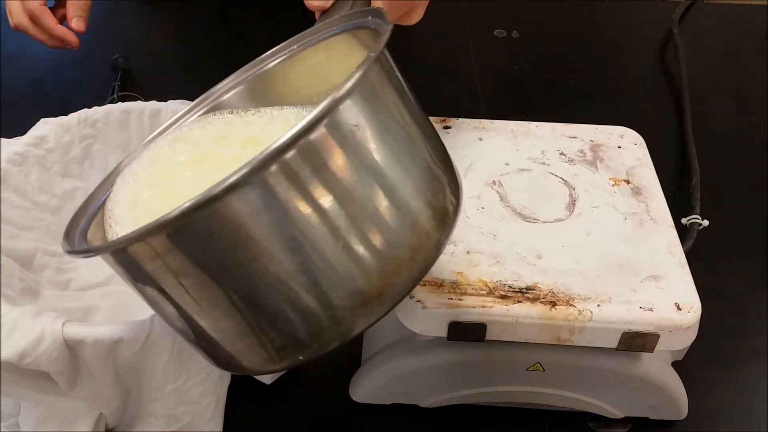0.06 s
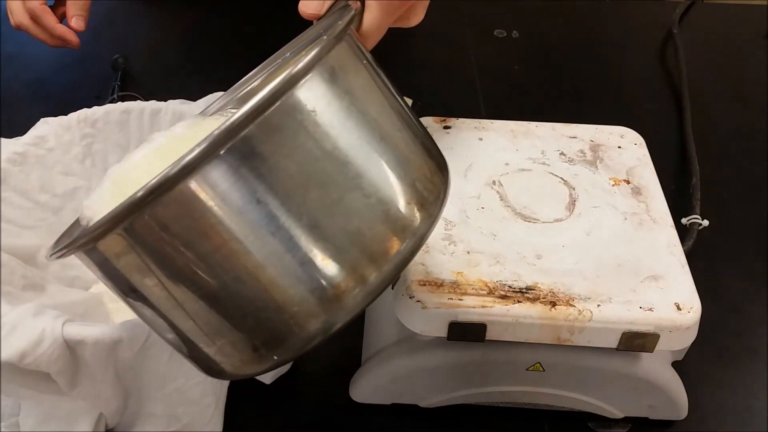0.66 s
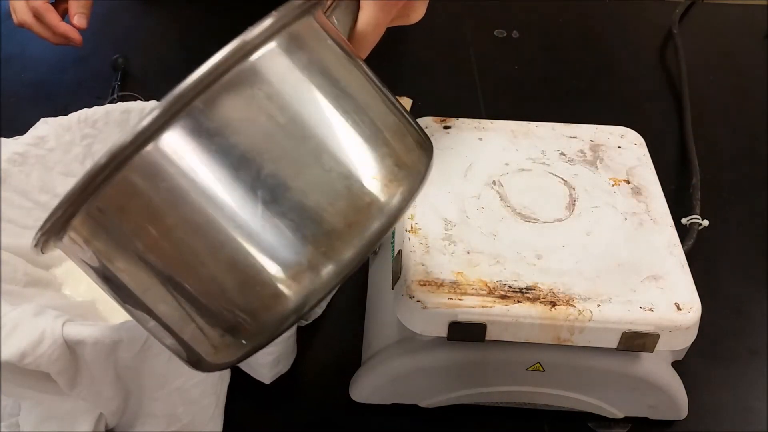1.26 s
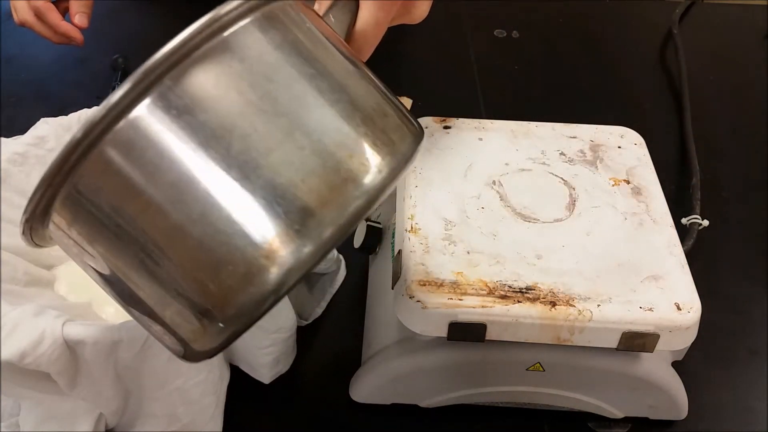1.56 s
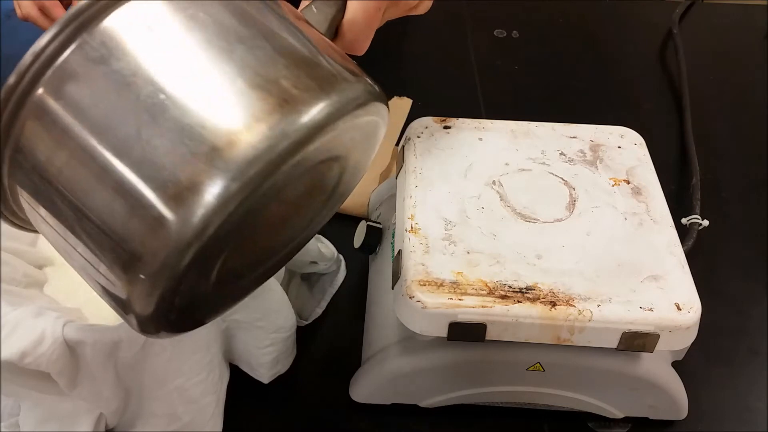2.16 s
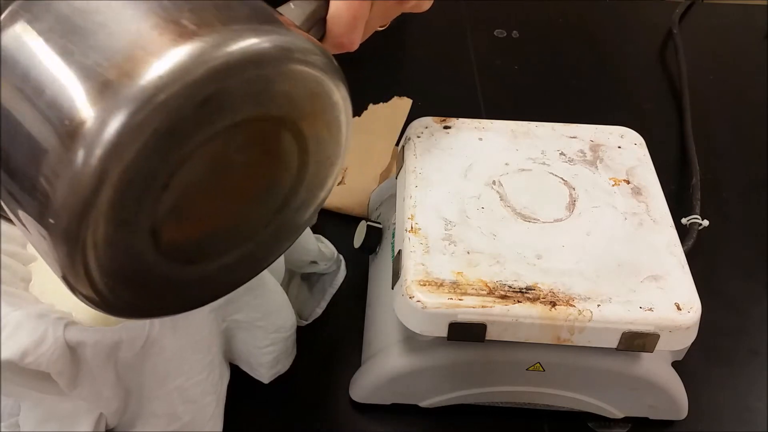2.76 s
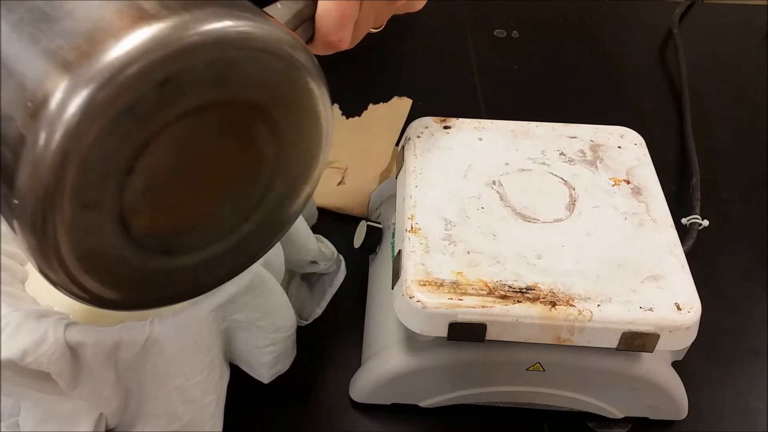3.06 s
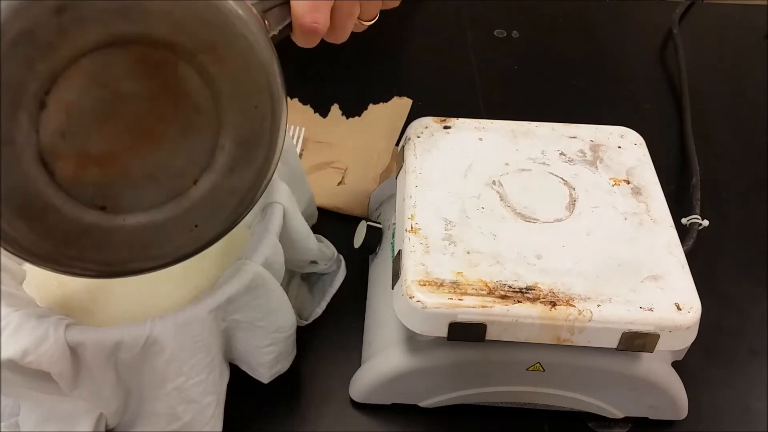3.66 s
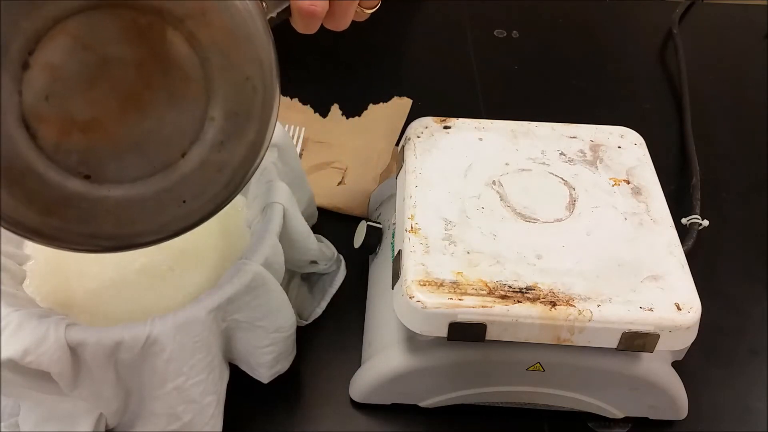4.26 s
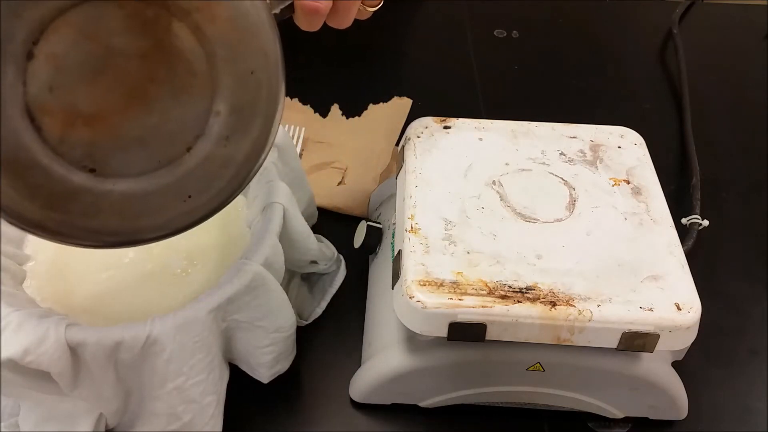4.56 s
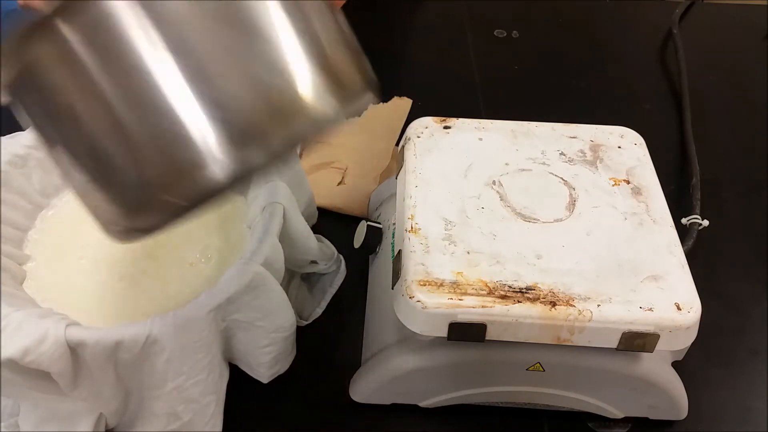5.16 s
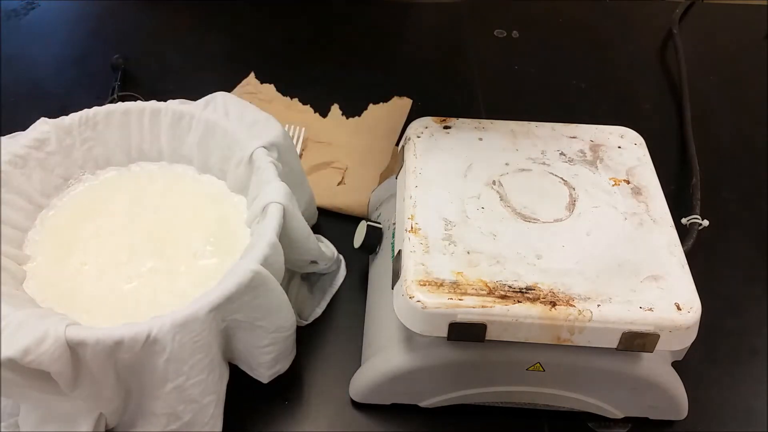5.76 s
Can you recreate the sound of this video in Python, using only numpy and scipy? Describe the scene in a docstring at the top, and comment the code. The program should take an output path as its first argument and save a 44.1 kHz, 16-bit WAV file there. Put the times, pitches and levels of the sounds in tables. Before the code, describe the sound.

Curdled milk is poured from a saucepan into a cloth-lined strainer. Whey first patters on the bare cloth, then bubbles and gurgles into a gathering pool as lumps of curd land with wet smacks and plops. The stream thins to a trickle and a few drops while froth fizzes softly. The pour is close and slightly left, in a hard-walled room with a steady low ventilation hum.

```python
"""Straining hot curds and whey

Curdled milk pours from a steel saucepan into a cloth-lined strainer, over humming ventilation.
Whey patters on the bare cloth, then drags ringing bubbles into the pool that gathers there.
Gushes of curd land with wet smacks and trap air that plops, while froth fizzes softly.
The stream thins to a trickle and a few last drops; a faint high rustle rises at the very end."""
import numpy as np
import sys
import numpy as np
from scipy import signal
from scipy.fft import rfft, irfft
from scipy.io import wavfile
from scipy.ndimage import uniform_filter1d, map_coordinates

SR = 44100
rng = np.random.default_rng(int(sys.argv[2]) if len(sys.argv) > 2 else 0)


def store_pcm(level_fs):
    """Save levels as 16-bit WAV."""
    pcm = np.round(np.clip(level_fs, -1, 1) * 32767).astype(np.int16)
    wavfile.write(sys.argv[1], SR, np.atleast_2d(pcm).T)


N = 265482
HZ = np.fft.rfftfreq(N, 1 / SR)
TIME = np.arange(N) / SR

# broad rush of the air duct: f/Hz, relative level/dB
DUCT_EQ = [(12, -27), (35, -8.5), (55, -4), (80, 0), (140, 0.5), (205, -13.5), (290, -9), (355, -16.5),
           (455, -11.5), (600, -24.5), (800, -25), (1100, -36.5), (1750, -38.5), (3200, -56.5)]
# narrow resonances humming in the duct: f/Hz, width/Hz, level/dB
DUCT_TONES = [(78.6, 1.2, -50.5), (123.96, 2.2, -47.5), (153.8, 5.7, -49.5), (194.6, 5.4, -57.5),
              (255.5, 8.8, -56), (270.5, 2.9, -55), (356.3, 2.5, -67), (469.6, 5.2, -58),
              (500.4, 7.6, -58.5), (545, 18, -66.5), (666, 12, -68.5), (721, 13, -69), (767.7, 5.8, -68),
              (944, 2.8, -76), (970, 11, -73.5)]
# slow swells in the hum: t/s, length/s, f/Hz, width/Hz, boost/dB
HUM_SWELLS = [(2.516, 0.44, 466, 12, 6.5), (3.744, 0.71, 267.2, 3.5, 10.5), (3.747, 0.44, 475, 46, 3)]
# microphone hiss: f/Hz, relative level/dB
HISS_EQ = [(1000, -10), (2500, -0.5), (3300, -5), (4300, -2), (6000, -14), (9000, -18.5), (10800, -8),
           (12200, 1.5), (13700, -4.5), (16000, 0)]
# how alike the room tone is left and right: f/Hz, coherence/0-1
AIR_COHERENCE = [(30, .99), (80, .99), (150, .98), (300, .88), (600, .6), (1200, .2), (3000, .05),
                 (12000, .05)]
# balance of the room tone: f/Hz, left minus right/dB
AIR_PAN = [(60, -4), (130, 1.5), (290, 1.5), (640, 3), (1410, 1), (3100, -1), (6820, -5.5), (15000, 6)]
# phase offset of the room tone: f/Hz, left lead/rad
AIR_PHASE = [(30, .4), (80, .3), (150, .1), (300, -.15), (800, -.65), (2000, -1.5)]
# reverb of the room: f/Hz, time to fall 60 dB/s
ROOM_DECAY = [(300, 0.98), (1500, 0.3), (5000, 0.36), (15000, 0.2)]
# the stream swells as the pan tips, then thins: t/s, level/dB
STREAM_FLOW = [(.35, -32), (.75, -7.5), (.92, -8.5), (1.2, -6.5), (1.65, 2), (2.3, -1), (2.6, -0.5),
               (3.0, -2), (3.3, -7.5), (3.7, -7), (4.0, -14), (4.6, -22)]
# masses of curd sliding over the rim: t/s, length/s, pool boost/dB, spray boost/dB
CURD_GUSHES = [(0.942, 0.023, 7, 9.5), (0.999, 0.096, 10.5, 8.5), (1.224, 0.21, 4.5, 4.5),
               (1.528, 0.075, 5.5, 5.5), (1.848, 0.099, 7.5, 9.5), (1.98, 0.053, 3, -2),
               (2.065, 0.088, 0, 3), (2.203, .055, 4, -1), (2.364, 0.18, 3, 6)]
# tone shared by the froth and the closing rustle: f/Hz, gain/dB
CRACKLE_EQ = [(2000, 2.5), (3500, -11.5), (5500, -11.5), (7000, -4), (8050, -1), (9300, -21), (11000, -3.5),
              (16000, -1)]
# tone of the ticking crumbs: f/Hz, gain/dB
CRUMB_EQ = [(800, -32), (1600, -9), (3500, 0), (5400, 3), (8000, 6.5), (11000, -26), (16000, 1)]
# tone of the spray: f/Hz, gain/dB
SPRAY_EQ = [(800, -29), (2000, -10.5), (3500, 4), (5200, 1), (6400, -6.5), (8000, -6), (11000, -1),
            (16000, -6)]
# tone of the pool's bubbles: f/Hz, gain/dB
POOL_EQ = [(900, -39.5), (1300, 2), (1800, -1.5), (2700, 2), (3700, -7), (5200, -12), (7000, -20.5)]
# air resonances between pan and strainer: f/Hz, width/Hz, gain/dB
CAVITY_MODES = [(1264, 58, 11), (1710, 130, 6.5), (2630, 320, -9), (3370, 240, 2), (5300, 590, -2)]
# air trapped under lumps of curd: t/s, level/dB, f/Hz, decay/cycles
CURD_PLOPS = [(0.793, -51, 2250, 2.3), (.949, -50, 3000, 3), (.954, -53, 1400, 2.6),
              (1.0136, -33.5, 4100, 8.3), (1.0255, -46, 5160, 9.2), (1.014, -50, 1600, 2.2),
              (1.028, -48, 1680, 3.3), (1.059, -43, 1720, 8.6), (1.085, -51, 1400, 5.4),
              (1.166, -45.5, 660, 4), (1.261, -50, 650, 5.4), (1.283, -36.5, 3320, 12),
              (1.322, -44, 617, 6.2), (1.353, -45, 676, 7), (1.39, -40, 2560, 6.5), (1.401, -36, 1810, 1.7),
              (1.403, -41, 3100, 3.2), (1.408, -37, 638, 5.2), (1.44, -49, 696, 3.7),
              (1.462, -46, 680, 4.5), (1.506, -37, 3540, 5), (1.539, -40, 2460, 9),
              (1.558, -33.5, 3610, 12), (1.567, -43, 2370, 5.1), (1.571, -45, 650, 5.6),
              (1.601, -39, 603, 9.9), (1.604, -38.5, 2450, 4), (1.677, -40, 3470, 8.7),
              (1.72, -39, 2640, 11), (1.745, -47, 650, 2.9), (1.749, -49, 1450, 5), (1.806, -51, 1670, 16),
              (1.826, -45, 1310, 7.9), (1.873, -43.5, 1300, 4.2), (1.89, -46.5, 3840, 7.1),
              (1.929, -48, 1570, 3.6), (1.939, -44, 2400, 8.6), (1.947, -43, 1720, 5.5),
              (1.962, -39, 2290, 7), (1.996, -38, 2400, 3), (2.026, -39, 1294, 14), (2.04, -53, 4200, 3.5),
              (2.042, -42.5, 703, 6.2), (2.07, -46, 637, 6), (2.072, -46, 2480, 8.7),
              (2.094, -39.5, 2260, 3.7), (2.131, -40, 3200, 10), (2.143, -37.5, 1690, 4.5),
              (2.1674, -40, 3250, 8.1), (2.171, -40, 1750, 3), (2.2085, -39, 1690, 4.2),
              (2.208, -38, 2160, 3.8), (2.207, -36.5, 650, 6), (2.217, -48, 2100, 3.6),
              (2.240, -41, 600, 8.3), (2.241, -37, 1670, 3.7), (2.256, -46, 1760, 4.6),
              (2.37, -46, 620, 4.5), (2.37, -42.5, 1750, 4.7), (2.398, -44, 1395, 4.5),
              (2.477, -50, 1410, 3), (2.49, -46, 1490, 3.7), (2.5734, -40, 1620, 6),
              (2.574, -48, 2570, 4.4), (2.69, -45, 1560, 4.4), (2.736, -53, 1680, 2.7),
              (2.83, -46, 1660, 5.8), (2.831, -48.5, 625, 3.4), (2.8545, -41, 1520, 3.6),
              (2.902, -39, 604, 9), (2.902, -50.5, 1780, 6.3), (2.956, -48.5, 1650, 4),
              (2.999, -47, 2400, 2.5), (3.012, -46, 1340, 7), (3.044, -50.5, 1540, 3.4),
              (3.114, -47, 3170, 4), (3.18, -59, 1550, 8.3), (3.335, -51, 1680, 7.2), (3.454, -56, 1720, 5),
              (3.532, -49.5, 1640, 5.4), (3.633, -42.5, 1710, 7.2), (3.633, -50, 2785, 22),
              (3.835, -53.5, 1430, 3.4)]
# wet hits of curd and drops: t/s, level/dB, body against brightness/dB, time to crest/ms
CURD_SMACKS = [(0.413, -64, -27, .6), (.508, -66, -25, 0.62), (.563, -59, -16, 0.8), (.583, -56, -18, .6),
               (0.6307, -51.5, -15, 0.83), (.676, -60, -19, .6), (.7262, -53, -31, 0.25),
               (.733, -49, -26, 0.57), (0.7487, -52, -22, 0.28), (0.769, -44, -16, 0.32),
               (0.859, -48.5, -27, 0.75), (0.8658, -48, -15, 0.69), (0.912, -55, -19, 0.95),
               (0.9468, -53, -20, 1.3), (0.978, -50, -8, 1.3), (1.0583, -49, -7, 0.89),
               (1.1266, -48.5, -13, 0.83), (1.143, -42, -21, 0.34), (1.197, -51, -1, 0.77),
               (1.2154, -51, -10, 1.1), (1.2226, -44.5, -11, 0.94), (1.2617, -45.5, 5, 1.2),
               (1.2804, -45, -17, 1.5), (1.3237, -50, -15, 0.67), (1.3598, -45.5, -1, 0.87),
               (1.3669, -45, 2, 0.66), (1.3992, -45.5, 1, 0.98), (1.458, -39, -4, 0.58),
               (1.5064, -34, -4.5, .35), (1.611, -46, 5, 0.84), (1.626, -53, 2, 0.46), (1.695, -54, 0, 0.3),
               (1.748, -52, 1, 0.32), (1.822, -49, 0, 0.42), (1.8901, -50, 2, 0.56),
               (1.9749, -42, -17, 0.14), (1.997, -40.5, -3, 1), (2.0388, -39, 1.5, 0.84),
               (2.0674, -50, 1, 0.42), (2.095, -60, -1, 0.62), (2.1117, -44, -8, 0.53),
               (2.142, -48, 2, 0.72), (2.169, -41.5, 3, 0.91), (2.207, -39.5, 1, 0.3),
               (2.266, -47, 0, 0.47), (2.2952, -46, -8, 0.27), (2.3684, -51, -3, 0.45),
               (2.375, -42, -19, 2.1), (2.393, -43.5, 2, 0.33), (2.4197, -38.5, -1, 1.3),
               (2.4536, -39.5, -14, 0.52), (2.4758, -50, 3, 0.41), (2.488, -53, 3, 0.37),
               (2.5323, -47.5, 1, 0.31), (2.5727, -44, 1, 1.44), (2.59, -42.5, -6, 0.68),
               (2.6484, -45, 6, 0.5), (2.652, -48, 0, 0.4), (2.6574, -47, -5, 0.67),
               (2.6687, -44.5, 7, 0.55), (2.714, -49, 0, 0.38), (2.7424, -46.5, 2, 0.56),
               (2.8047, -51, -2, 0.46), (2.831, -54, -5, 0.43), (2.8557, -42.5, -9, .35),
               (2.9036, -51, -11, 0.38), (2.9567, -59.5, 3, 2), (3, -56, 3, .4), (3.043, -57, -16, 0.4),
               (3.113, -55, -12, 0.75), (3.145, -53, 5, .4), (3.201, -54, -8, .4), (3.2132, -48, -1.5, 0.4),
               (3.2965, -56, -18, 0.35), (3.392, -49, -4, 0.91), (3.4335, -58, -6, 0.68),
               (3.451, -59, -4, .4), (3.621, -57.5, 0, 0.72), (3.688, -56, -10, 0.39),
               (3.705, -64, 3, 0.39), (3.955, -62, -31, 0.35), (5.003, -65, -26, 0.84)]

COVERED_S = 1.44  # the pool covers the cloth


def gain_of(db):
    """Decibels to amplitude."""
    return 10 ** (np.asarray(db) / 20)


def unit_rms(x):
    """Scales to rms 1."""
    return x / np.sqrt(np.mean(x ** 2) + 1e-20)


def curve_at(points, hz):
    """Reads a curve along a log-frequency axis."""
    f, value = np.transpose(points)
    return np.interp(np.log(hz + 1), np.log(f + 1), value)


def eq(x, points):
    """Filters by a curve of f/Hz, gain/dB."""
    size = x.shape[-1]
    return irfft(rfft(x) * gain_of(curve_at(points, np.fft.rfftfreq(size, 1 / SR))), size)


def whitened(puff):
    """Flattens the broad humps in a puff's spectrum, keeping its energy."""
    spectrum = rfft(puff)
    power = uniform_filter1d(abs(spectrum) ** 2, size=len(puff) // 40)
    return irfft(spectrum / np.sqrt(power + 1e-12), len(puff)) * np.linalg.norm(puff)


def add(mix, s, sound):
    """Mixes a stereo sound in at time s."""
    part = mix[:, round(s * SR):][:, :sound.shape[1]]
    part += sound[:, :part.shape[1]]


def panned(sound, left_db, lag_ms=.16, scatter_ms=.075):
    """The strainer stands to the left, so the right side hears it softer and a little later."""
    lag = max(lag_ms + scatter_ms * rng.standard_normal(), 0) * SR / 1000
    late = map_coordinates(sound, [np.arange(len(sound)) - lag], order=3)
    return np.array([sound * gain_of(left_db / 2), late * gain_of(-left_db / 2)])


def surge(start, length, rise, fall):
    """Attack, hold and release, from 0 to 1 and back; length includes the attack."""
    return np.clip(np.minimum((TIME - start) / rise, 1 - (TIME - start - length) / fall), 0, 1)


def flow_db():
    """Strength of the stream at every moment."""
    return np.interp(TIME, *np.transpose(STREAM_FLOW), left=-200)


def gush_db(column):
    """What the gushes add to the pool (column 2) or to the spray (column 3)."""
    return sum(row[column] * surge(row[0], row[1], rise=.009, fall=.05) for row in CURD_GUSHES)


def burst(ms, size=1024):
    """A film of liquid tears: a puff of noise that crests after ms and dies away."""
    age = np.maximum(np.arange(size) - 32, 0) / SR / (ms / 1000)
    return age * np.exp(1 - age) * rng.choice([-1., 1.], size)


def squelch(hz, ms):
    """An air pocket collapses: a puff of noise centred on its pitch, peak rms 1."""
    band = [(hz * .55, -20), (hz * .9, -2), (hz * 1.3, -2), (hz * 2, -13), (hz * 4, -32)]
    puff = eq(whitened(burst(ms, size=3072)), band)
    return puff / np.sqrt(uniform_filter1d(puff ** 2, size=88).max())


def bubble(hz, cycles, rise, size=3072):
    """Trapped air rings for a few cycles, its pitch rising as it nears the surface."""
    turns = np.arange(size) / SR * hz
    age = turns / cycles
    glide = 1 + rise * np.minimum(age, 10) / 2
    return (1 - np.exp(-turns ** 2)) * np.exp(-age) * np.sin(2 * np.pi * turns * glide)


def shower(grains, per_s, spread_db, left_db):
    """Scatters each grain at random moments and levels, a few of them loud."""
    out = np.zeros((2, N))
    count = max(int(per_s * N / SR / len(grains)), 1)
    for grain in grains:
        when, strength = np.random.default_rng(rng.integers(2 ** 31)).random((count, 2)).T
        gains = gain_of(spread_db * np.minimum(-np.log(1 - strength), np.pi))
        train = np.bincount((when * N).astype(int), gains, N)
        out += signal.oaconvolve(train[None], panned(unit_rms(grain), left_db), axes=1)[:, :N]
    return out


def ventilation(rush_db=-40.5, hiss_db=-71):
    """The bed: duct noise with humming resonances, nearly mono in the bass, plus microphone hiss."""
    power = gain_of(curve_at(DUCT_EQ, HZ)) ** 2 / (1 + (HZ / 3500) ** 8)
    power *= gain_of(rush_db) ** 2 / power.sum()
    for hz, width, db in DUCT_TONES:
        peak = 1 / (1 + ((HZ - hz) / width) ** 2) ** 2
        power += gain_of(db) ** 2 * peak / peak.sum()
    hiss = gain_of(curve_at(HISS_EQ, HZ)) ** 2
    power += gain_of(hiss_db) ** 2 * hiss / hiss.sum()
    left, diffuse = np.exp(2j * np.pi * rng.random((2, len(HZ))))
    coherence = curve_at(AIR_COHERENCE, HZ)
    pair = np.array([left, coherence * left + np.sqrt(1 - coherence ** 2) * diffuse])
    pair *= gain_of(np.outer([1, -1], curve_at(AIR_PAN, HZ)) / 2)
    pair *= np.exp(1j * np.outer([1, -1], curve_at(AIR_PHASE, HZ)) / 2)
    return irfft(pair * np.sqrt(power / 2) * N, N)


def hum_swells(bed):
    """Single bands of the hum grow and fade."""
    out = bed.copy()
    for start, length, hz, width, db in HUM_SWELLS:
        band = irfft(rfft(bed) * np.exp(-((HZ - hz) / width) ** 2), N)
        out += band * (gain_of(db * surge(start, length, rise=.11, fall=.11)) - 1)
    return out


def froth_and_rustle(froth_db=-68, follows=.46, fade_db_per_s=19, rustle_s=5.83, rustle_db=-70.5):
    """Foam fizzes and fades after the flow; a faint high rustle, perhaps cloth or pan, rises last."""
    grains = [burst(ms) for ms in np.geomspace(.3, 1.5, 12)]
    crackle = shower(grains, per_s=900, spread_db=4, left_db=2)
    drained_s = np.maximum(TIME - STREAM_FLOW[-1][0], 0)
    froth = gain_of(froth_db + follows * flow_db() - fade_db_per_s * drained_s)
    rustle = gain_of(rustle_db) * np.clip((TIME - rustle_s) / .18, 0, 1)
    return (froth + rustle) * unit_rms(eq(crackle, CRACKLE_EQ))


def crumbs(level_db=-68, follows=.91, runoff_s=2.1, fade_s=.32, early_db=-5, empty_s=3.95):
    """Curd crumbs tick on the wet cloth, most once the whey has run off, until the pan is empty."""
    grains = [burst(ms) for ms in np.geomspace(.25, .7, 12)]
    ticks = shower(grains, per_s=110, spread_db=2.8, left_db=2)
    whey = np.clip(1 - (TIME - runoff_s) / fade_s, 0, 1)
    remaining = np.clip((empty_s - TIME) / fade_s, 0, 1)
    level = remaining * gain_of(level_db + follows * flow_db() + early_db * whey)
    return level * unit_rms(eq(ticks, CRUMB_EQ))


def spray(level_db=-70.5, follows=.96, bare_db=13, first_curd_s=.99, whey_body_db=-5):
    """Fine droplets patter on the cloth, harder while it is bare, thin until the first curd lands."""
    grains = [burst(ms) for ms in np.geomspace(.15, .9, 24)]
    drops = unit_rms(eq(shower(grains, per_s=600, spread_db=4.4, left_db=3), SPRAY_EQ))
    body = eq(drops, [(5500, 0), (7500, -30)])
    drops += body * (gain_of(whey_body_db) - 1) * (TIME < first_curd_s)
    bare = (1 - np.tanh((TIME - COVERED_S) / .14)) / 2
    return gain_of(level_db + follows * flow_db() + gush_db(column=3) + bare_db * bare) * drops


def gurgle(level_db=-57, follows=.45, from_s=1.1, hz=674, sink_hz_per_s=56, shallow_s=1.38):
    """Large air pockets churn under the heavy stream, with a 5 dB lift as the pool first forms."""
    grains = [bubble(hz * step, cycles=4.5, rise=.015) for step in np.geomspace(.8, 1.12, 12)]
    churn = eq(shower(grains, per_s=170, spread_db=2, left_db=1), [(800, 0), (1050, -16)])
    age = np.maximum(TIME - from_s, 0)
    slowed = np.cumsum(1 - sink_hz_per_s * age / hz)  # larger pockets ring lower and longer
    sinking = np.array([np.interp(slowed, np.arange(N), side) for side in churn])
    forming = np.exp(-((TIME - shallow_s) / .1) ** 2)
    level = np.minimum(age / .1, 1) * gain_of(level_db + follows * flow_db() + 5 * forming)
    return level * unit_rms(sinking)


def cavity(splashes, slosh_depth=.03, slosh_per_s=14):
    """The air between pan and strainer rings with each splash; its pitches wander as the milk sloshes."""
    out = splashes.copy()
    knots = np.arange(0, N / SR + 1, 1 / slosh_per_s)
    for hz, width, db in CAVITY_MODES:
        slosh = np.interp(TIME, knots, rng.standard_normal(len(knots)))
        carrier = np.exp(2j * np.pi * np.cumsum(hz * (1 + slosh_depth * slosh)) / SR)
        pole = np.exp(-np.pi * width / SR)
        ring = carrier * signal.lfilter([1 - pole], [1, -pole], splashes / carrier)
        out += gain_of(db) * 2 * ring.real
    return out


def pool(level_db=-61.5, from_s=.63, filling_s=.57, ring_s=.0012, young_db=2, darken_db_per_s=1.5):
    """Curds squelch in and the stream drags bubbles under, a few ringing clear; deeper sounds darker."""
    pitches = np.geomspace(1200, 5800, 30) * rng.uniform(.867, 1, 30)
    grains = [bubble(hz, cycles=hz * ring_s, rise=.007) for hz in pitches]
    grains += [squelch(hz, ms=.8) for hz in pitches]
    churn = shower(grains, per_s=1400, spread_db=4.6, left_db=3.5)
    churn = unit_rms(cavity(eq(churn, POOL_EQ)))
    clear_pops = [bubble(hz, cycles=8, rise=.02) for hz in np.geomspace(1350, 3900, 24)]
    churn += .22 * unit_rms(shower(clear_pops, per_s=45, spread_db=2.5, left_db=2))
    treble = eq(churn, [(1900, -30), (2400, 0)])
    treble_db = young_db - darken_db_per_s * np.clip(TIME - COVERED_S, 0, 2)
    churn += treble * (gain_of(treble_db) - 1)
    filled = np.clip((TIME - from_s) / filling_s, 0, 1)
    return filled * gain_of(level_db + flow_db() + gush_db(column=2)) * churn


def plops(level_db=-1.8, knock_db=-5, closing_db=-15):
    """Sinking curds trap bubbles that the thick milk damps fast; each hole closes with a squelch."""
    out = np.zeros((2, N))
    for s, db, hz, cycles in CURD_PLOPS:
        squelch_db = -6 - 4 * max(cycles - 4, 0)  # longer rings are cleaner
        plop = bubble(hz, cycles, rise=.006) + gain_of(squelch_db) * squelch(hz, ms=.6)
        plop += gain_of(knock_db) * (cycles < 7) * squelch(hz * 1.3, ms=.2)  # the lump's first slap
        add(out, s, gain_of(db + level_db) * panned(plop, left_db=3.5, lag_ms=.125, scatter_ms=.015))
        closing = panned(squelch(hz * 1.15, ms=2), left_db=3)
        add(out, s + .0047, gain_of(db + level_db + closing_db) * closing)
    return out


def smacks(level_db=3, droplet_db=-16, snap_db=14):
    """Each lump slaps the wet cloth and throws a droplet that lands just after; heavy ones are darker."""
    out = np.zeros((2, N))
    for s, db, body_db, ms in CURD_SMACKS:
        heavy_db = np.clip(body_db + 4, -20, 4)
        left_db = .5 + 8.5 * np.exp(-(s / 1.33) ** 2)  # the stream moves from left edge to middle
        tone = [(900, -31 + heavy_db), (1600, -7 + heavy_db), (3500, heavy_db),
                (5400, .5 + heavy_db / 2), (6800, -6.5), (8500, .5),
                (11000, -3 - heavy_db / 5), (16000, -7 - heavy_db / 2)]
        for wait_s, hit_db in [(0, 0), (rng.uniform(.0015, .003), droplet_db)]:
            puff = burst(ms)
            puff[np.argmax(abs(puff))] *= 1 + gain_of(snap_db)  # one sharp snap at the crest
            hit = panned(eq(whitened(puff), tone), left_db, lag_ms=.15, scatter_ms=.035)
            add(out, s + wait_s, gain_of(db + level_db + hit_db) * hit)
    return out


def room(pour, early_db=-11, tail_db=-10):
    """Quick reflections from pan and bench, then the short tail of a hard-walled room."""
    size = SR // 2
    age = np.arange(size) / SR
    taps = rng.standard_normal((2, size)) * (rng.random((2, size)) < .1)
    early = taps * np.exp(-age / .003) * (age > .0005)
    early /= np.linalg.norm(early, axis=1)[:, None]
    hz, t, bands = signal.stft(taps[::-1] * (age > .008), SR, nperseg=256)
    decay = gain_of(-60 * t / curve_at(ROOM_DECAY, hz)[:, None])
    tail = signal.istft(bands * decay, SR, nperseg=256)[1][:, :size]
    response = gain_of(early_db) * early + gain_of(tail_db) * tail / np.linalg.norm(tail[0])
    return pour + signal.fftconvolve(pour, response, axes=1)[:, :N]


def scene():
    """The pour in its room, over the ventilation bed."""
    pour = spray() + crumbs() + froth_and_rustle() + pool() + gurgle() + smacks() + plops()
    return room(pour) + hum_swells(ventilation())


def record(dry):
    """A steep high cut near 16 kHz."""
    lowpass = signal.firwin(511, 16050, window=("kaiser", 9), fs=SR)
    return signal.oaconvolve(dry, lowpass[None], "same")


dry = scene()
out = record(dry)
store_pcm(out)
```